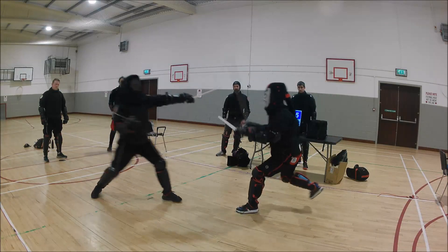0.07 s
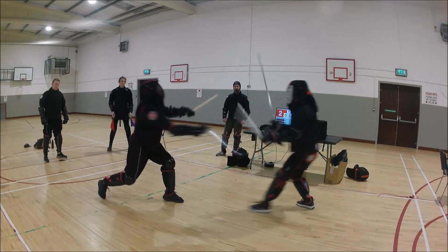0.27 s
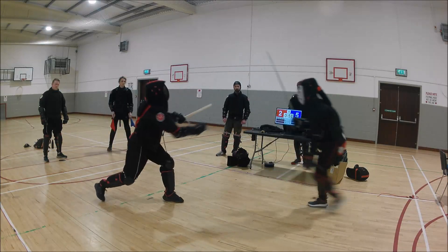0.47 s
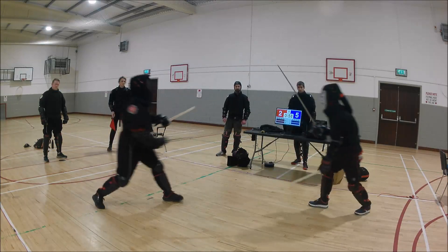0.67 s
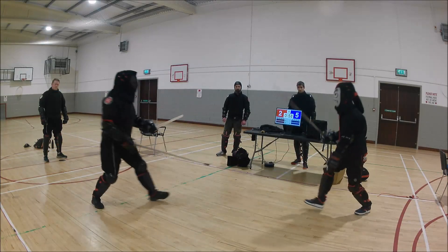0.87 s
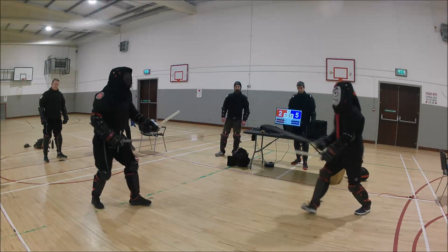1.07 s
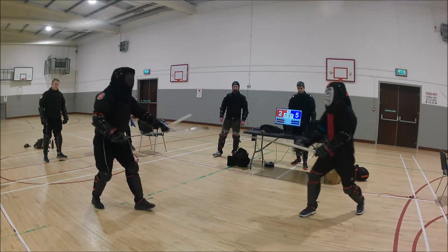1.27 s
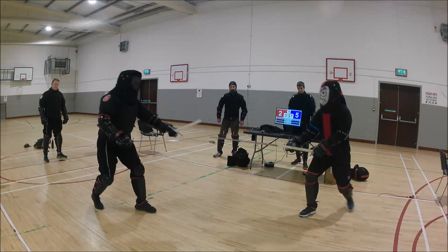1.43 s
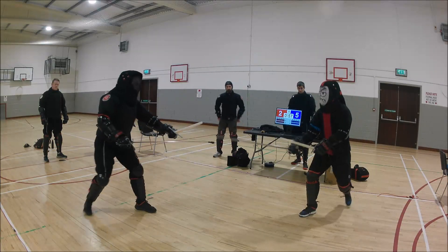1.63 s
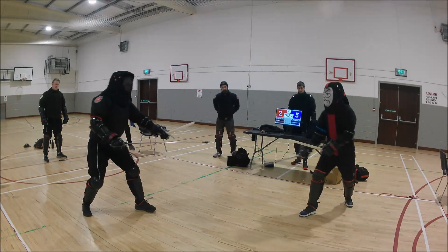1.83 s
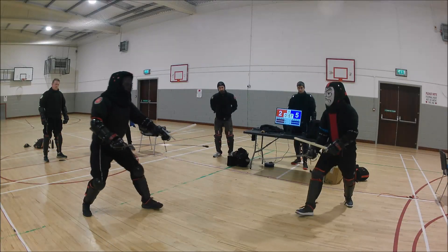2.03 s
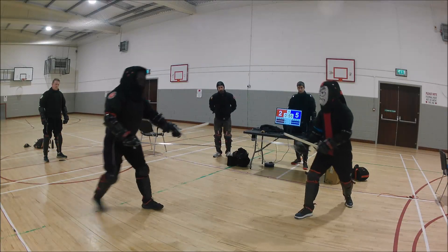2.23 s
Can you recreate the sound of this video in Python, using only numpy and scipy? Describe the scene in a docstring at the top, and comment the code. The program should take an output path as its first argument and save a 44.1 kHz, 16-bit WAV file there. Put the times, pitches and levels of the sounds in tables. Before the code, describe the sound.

Sword blades clatter in a quick, ringing burst as a foot stamps on a wooden floor. Rubber soles squeak, the blades touch again lightly, and soft steps follow in an echoing sports hall with a low hum.

```python
"""Fencing in a sports hall

One of two fencers lunges with a stamp that booms in the sprung wooden floor, and the blades clatter
in a quick run of contacts, each a crack and a ring of metal. Rubber soles squeak, the blades touch
again, then soft steps as they part. The large hall is still ringing at the start, over a low hum,
ventilation and a faint hiss."""
import sys
import numpy as np
from scipy import signal
from scipy.fft import rfft, irfft
from scipy.io import wavfile

SR = 44100
rng = np.random.default_rng(int(sys.argv[2]) if len(sys.argv) > 2 else 0)


def transcribe(signal):
    """Save signal, clipped to [-1, 1], as a 16-bit WAV file at the path in sys.argv[1]."""
    frames = np.atleast_2d(signal).T
    limited = np.clip(frames, -1, 1)
    pcm = np.round(limited * 32767).astype(np.int16)
    wavfile.write(sys.argv[1], SR, pcm)


N = 105840
T = np.arange(N) / SR
BOOM_SHAPE = 2.04  # higher makes the floor's swell narrower


def blades():
    """Each contact cracks and rings the blades' modes, in a balance set by where it lands."""
    # blade on blade: (time [s], level [dB], brightness [Hz], low knock [dB], middle clack [dB])
    contacts = [(.2283, -26, 9000, -8, 7), (.2360, -18.5, 8000, 4, -1), (.2434, -20, 11000, -8, -4),
                (.2541, -16.5, 7300, -6, 0), (.2830, -22.7, 4200, -3, 0), (.2975, -21.5, 4600, -8, 3),
                (.3000, -26, 4000, -4, 3), (.3131, -25.5, 4300, 0, 1), (.3175, -31, 7000, -2, 9),
                (.628, -43, 2500, 8, 7), (.6534, -33.5, 2800, 6, 10), (2.3755, -43, 1200, -5, 8)]
    # modes of the gripped blades: (frequency [Hz], level [dB], t60 [s])
    modes = [(985, -10, .028), (1910, -6.5, .011), (2980, -11, .010), (3450, -3, .013), (4380, -14, .007),
             (4900, -9, .007), (5380, -15, .008), (6220, -18, .010), (7350, -21, .007), (9600, -31, .005),
             (11400, -25, .005), (1039, -34.5, .55), (1739, -39, .35), (1809, -43, .9), (3311, -44, .6),
             (4807, -42, .5), (5561, -42, .8), (6051, -44, .6), (6304, -43, .5)]
    # spectrum of the crack: (frequency [Hz], level [dB])
    crack_colour = [(500, -12), (1000, -5), (2000, -9.5), (2500, -3), (3300, -6.5), (5000, -5), (7500, -17),
                    (8300, -42), (11300, -16.5), (12800, -50)]
    knock_hz, clack_hz, clang_hz = 1050, 1900, 2900
    crack_db, crack_decay_s, scatter_db = -14, 0.002, 3
    mode_hz = np.array(modes)[:, 0]
    balance_db = np.array([at_hz([(knock_hz, knock), (clack_hz, clack), (clang_hz, 0)], mode_hz)
                           for *_, knock, clack in contacts])
    strengths = from_db(balance_db + scatter_db * rng.standard_normal(balance_db.shape))
    grit, cracks, blows = rng.standard_normal(N), np.zeros(N), []
    for start, db, top_hz, *_ in contacts:
        click = from_db(db) * (np.arange(N) == int(start * SR))
        blows.append(softened(click, top_hz))
        decay = (T >= start) * np.exp(-np.abs(T - start) / crack_decay_s)
        cracks += softened(from_db(db + crack_db) * grit * decay, top_hz)
    drives = strengths.T @ np.array(blows)  # one track of blows per mode
    ringing = sum((-1) ** k * from_db(db) * ring(drives[k], hz, t60)
                  for k, (hz, db, t60) in enumerate(modes))
    return ringing + coloured(cracks, crack_colour)


def blade_slide():
    """The bind ends in a short, bright slide of blade along blade."""
    # spectrum of the scrape: (frequency [Hz], level [dB])
    colour = [(1000, -2), (3400, -3), (4200, 0.5), (5000, 1), (5700, -6.5), (6400, 2.5), (7600, -24.5),
              (15000, -33)]
    peak_s, width_s = .3265, .0045
    return from_db(-36) * noise(colour) * np.exp(-.5 * ((T - peak_s) / width_s) ** 2)


def footfalls():
    """The sprung floor booms under each foot while the sole gives a dull knock."""
    # feet landing: (time [s], boom level [dB], boom pitch [Hz], boom rise [s], knock level [dB])
    steps = [(0.127, -38.5, 228.2, 0.013, -45.5), (0.204, -11.5, 97.47, 0.02143, -24),
             (.232, -7, 123.2, 0.01148, -28.5), (0.236, -16, 54, 0.00917, -36),
             (0.472, -27, 89.97, 0.0191, -62), (0.536, -27, 164, 0.0101, -37.5),
             (0.619, -29, 50.13, 0.0256, -40.5), (.740, -31.5, 53.85, 0.0092, -44),
             (.94, -47, 191.5, 0.0596, -45.5), (1.095, -26, 144.7, 0.017, -35),
             (1.297, -39.5, 124.2, 0.0332, -41), (1.673, -27.5, 139.1, 0.0162, -36.5),
             (2.048, -27, 135.2, 0.0168, -33), (2.1, -44.5, 65, 0.013, -62),
             (2.339, -24.5, 75.6, 0.0171, -38)]
    # spectrum of the sole's knock: (frequency [Hz], level [dB])
    knock_colour = [(40, 1), (120, 9), (210, 4.5), (280, -6.5), (370, -8.5), (520, -27.5), (720, -26),
                    (1000, -47), (2500, -48), (8000, -83), (16000, -105)]
    attack_s, decay_s = .003, 0.0687
    knock, out = noise(knock_colour), np.zeros(N)
    for start, boom_db, hz, rise, knock_db in steps:
        age = np.maximum(T - start, 0)
        out += from_db(boom_db) * swell(start, rise, BOOM_SHAPE) * np.sin(2 * np.pi * hz * age)
        envelope = (1 - np.exp(-age / attack_s)) * np.exp(-(age / decay_s) ** 2)
        out += from_db(knock_db) * envelope * knock
    return out


def boards():
    """The stamp of the lunge makes the floorboards ring briefly."""
    # floorboard modes: (frequency [Hz], level [dB])
    modes = [(437, -32), (665, -37.5)]
    stamp_s, rise_s = 0.2337, 0.01913
    tones = sum(from_db(db) * np.sin(2 * np.pi * hz * (T - stamp_s)) for hz, db in modes)
    return swell(stamp_s, rise_s, BOOM_SHAPE) * tones


def squeaks():
    """Rubber sticks and slips on varnish: short, unsteady, gliding tones."""
    # slipping soles: (time [s], length [s], level [dB], start pitch [Hz], end pitch [Hz], wobble [Hz])
    slips = [(.283, .032, -39.5, 3990, 4030, 55), (.328, .028, -47, 4010, 4030, 30),
             (.365, .024, -48, 4010, 4000, 30), (.464, .042, -45, 4380, 4720, 140),
             (.526, .036, -45, 4540, 4580, 95), (.585, .04, -54, 4600, 4200, 120)]
    wobble_bandwidth_hz = 280
    pole = np.exp(-2 * np.pi * wobble_bandwidth_hz / SR)
    wobble = rms_one(signal.lfilter([1], [1, -2 * pole, pole * pole], rng.standard_normal(N)))
    out = np.zeros(N)
    for start, length, db, start_hz, end_hz, wobble_hz in slips:
        progress = np.clip((T - start) / length, 0, 1)
        hz = start_hz + (end_hz - start_hz) * progress + wobble_hz * wobble
        tone = np.sqrt(2) * np.sin(2 * np.pi * np.cumsum(hz) / SR)
        out += from_db(db) * np.sin(np.pi * progress) * tone
    return out


def scuffs():
    """Short dry rasps of shoes and protective gear as the bodies move."""
    # scuffs and rattles: (time [s], level [dB], rise [s])
    rasps = [(0.234, -30.5, 0.001756), (0.245, -31.5, 0.0015), (0.267, -30.5, 0.0016), (0.287, -41, 0.0117),
             (0.622, -55, 0.017), (0.685, -53, 0.0029), (1.679, -65, .005), (2.112, -63.5, 0.0049),
             (2.386, -67, 0.0075)]
    # spectrum of the rasp: (frequency [Hz], level [dB])
    colour = [(400, 1), (650, 3), (780, -4.5), (980, -2), (1300, -9), (1900, -3), (2600, -13.5),
              (4500, -24), (8000, -33), (14000, -73)]
    return noise(colour) * sum(from_db(db) * swell(start, rise, shape=0.92) for start, db, rise in rasps)


def hall(send):
    """Diffuse reverberation that builds up and dies at its own rate in each band."""
    # the hall's decay times: (frequency [Hz], t60 [s])
    t60s = [(60, 2), (150, 1.5), (500, 3.5), (1800, 4.5), (4300, 2.5), (7000, 1.5), (12000, 0.01)]
    # tone of the reverb: (frequency [Hz], gain [dB])
    colour = [(50, 2.5), (130, -7.5), (400, -12), (1000, -7), (1900, -2), (2700, -12.5), (3400, -8.5),
              (4300, -4), (6300, 8), (12000, -3.5)]
    build_s = .015
    build_up = 1 - np.exp(-(T / build_s) ** 2)
    hz = np.fft.rfftfreq(N, 1 / SR)
    spectrum = rfft(rng.standard_normal(N)) * from_db(at_hz(colour, hz))
    edges_hz = np.geomspace(25, 18000, 20)
    response = np.zeros(N)
    for low, high in zip(edges_hz, edges_hz[1:]):
        band = irfft(spectrum * ((hz >= low) & (hz < high)), N)
        envelope = build_up * from_db(-60 * T / at_hz(t60s, np.sqrt(low * high)))
        response += band * envelope / np.sqrt(np.sum(envelope ** 2))
    return signal.fftconvolve(send, response)[:N]


def lingering_tail():
    """Reverberation of an earlier exchange still hangs in the air and fades."""
    # spectrum of the tail: (frequency [Hz], level [dB])
    colour = [(150, 24), (250, 5), (400, -3), (560, -0.5), (680, -3), (850, -17), (1100, -2.5), (1800, 5),
              (2600, -5), (3400, -5.5), (4400, 4.5), (5500, -8.5), (6500, -10), (7500, -28), (10000, -31.5)]
    start_db, fall_db_per_s = -44.5, 15
    return from_db(start_db - fall_db_per_s * T) * noise(colour)


def room_tone():
    """A steady bed of ventilation, hiss and low hum."""
    # spectrum of ventilation and hiss: (frequency [Hz], level [dB])
    air = [(25, 9), (60, 1.5), (150, -8.5), (250, -7), (400, -22), (800, -33.5), (1200, -31.5),
           (2000, -32.5), (3200, -41.5), (4800, -44.5), (6000, -32), (8000, -46.5), (15000, -48.5)]
    # the hum's tone: (frequency [Hz], level [dB])
    tones = [(122.5, -74)]
    hum = sum(from_db(db) * np.sqrt(2) * np.sin(2 * np.pi * (hz * T + rng.random())) for hz, db in tones)
    return hum + from_db(-50.5) * noise(air)


def ring(clicks, hz, t60):
    """A unit click sets a sine of height 1 ringing."""
    radius, angle = from_db(-60 / (t60 * SR)), 2 * np.pi * hz / SR
    return signal.lfilter([0, np.sin(angle)], [1, -2 * radius * np.cos(angle), radius**2], clicks + 1e-18)


def softened(x, top_hz):
    """A soft contact passes little above its top frequency."""
    return signal.lfilter(*signal.butter(2, min(top_hz, SR / 3), fs=SR), x + 1e-18)


def swell(start, rise, shape):
    """An envelope that climbs to 1 in the rise time and dies away."""
    progress = np.maximum(T - start, 0) / rise
    return (progress * np.exp(1 - progress)) ** shape


def noise(colour):
    """Noise of about unit rms with a given spectrum."""
    return coloured(rng.standard_normal(N), colour)


def coloured(x, colour):
    """An EQ curve that rolls off below its first point; white noise keeps its level."""
    hz = np.fft.rfftfreq(N, 1 / SR)
    gain = from_db(at_hz(colour, hz)) * np.minimum(hz / colour[0][0], 1) ** 2
    return irfft(rfft(x) * rms_one(gain), N)


def at_hz(points, hz):
    """Read a table on a log-frequency axis."""
    point_hz, values = np.transpose(points)
    return np.interp(np.log(np.maximum(hz, 1)), np.log(point_hz), values)


def from_db(db):
    """Decibels to gain."""
    return 10 ** (np.asarray(db) / 20)


def rms_one(x):
    """Scale to unit rms."""
    return x / np.sqrt(np.mean(x ** 2) + 1e-20)


def scene():
    """Blades and feet, heard in mono directly and through the hall."""
    clash = blades() + blade_slide()
    feet = footfalls() + scuffs()
    rubber = squeaks()
    reverb = hall(send=from_db(-20) * clash + from_db(-4) * feet + from_db(2.5) * rubber)
    return (clash + feet + boards() + rubber + reverb + room_tone() + lingering_tail())[None]


def record(dry):
    """A steep low-pass cuts the very top."""
    stop_hz, stop_db = 16300, 70
    return signal.sosfilt(signal.cheby2(16, stop_db, stop_hz, fs=SR, output="sos"), dry)


dry = scene()
out = record(dry)
transcribe(out)
```